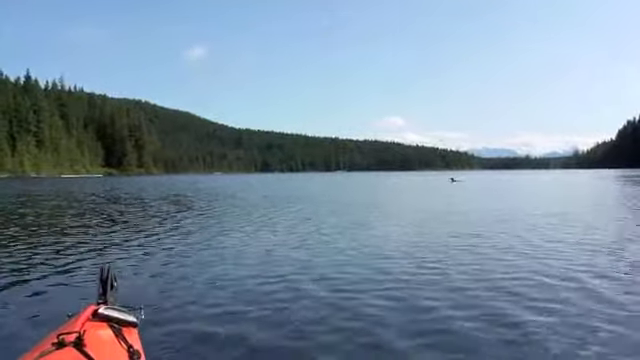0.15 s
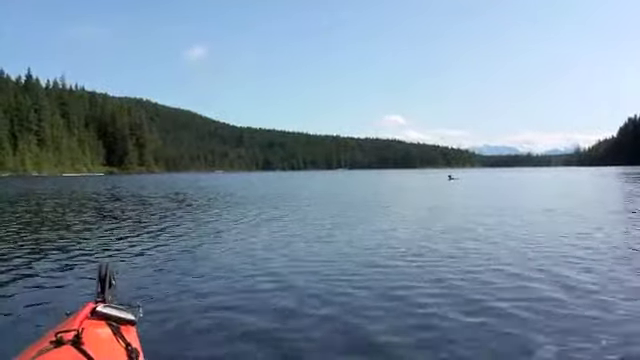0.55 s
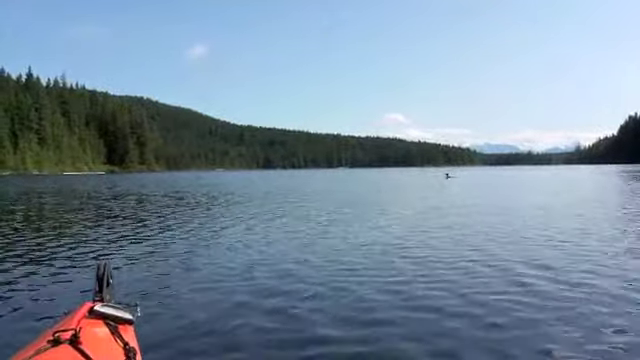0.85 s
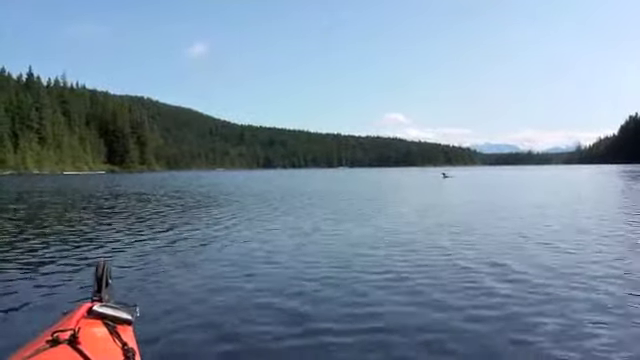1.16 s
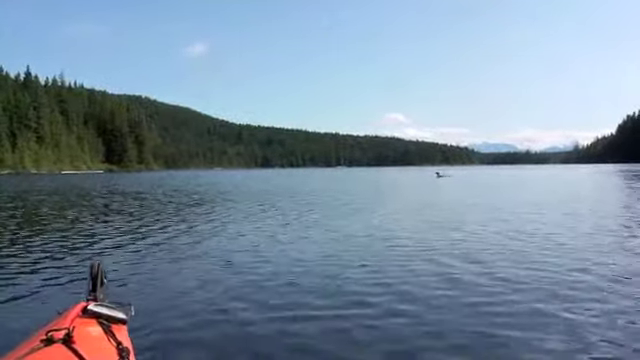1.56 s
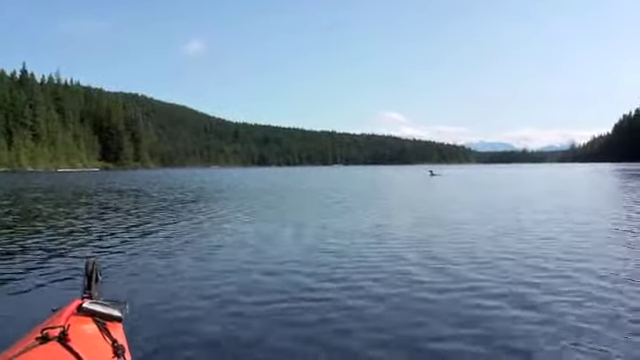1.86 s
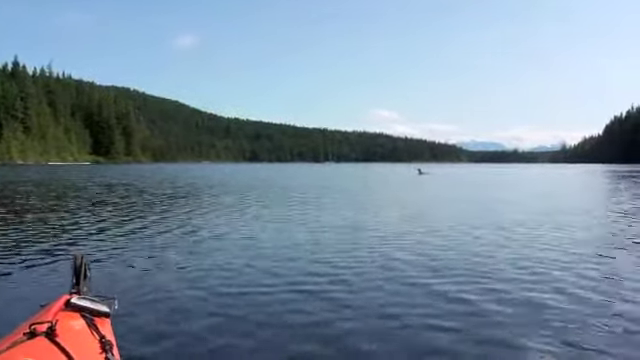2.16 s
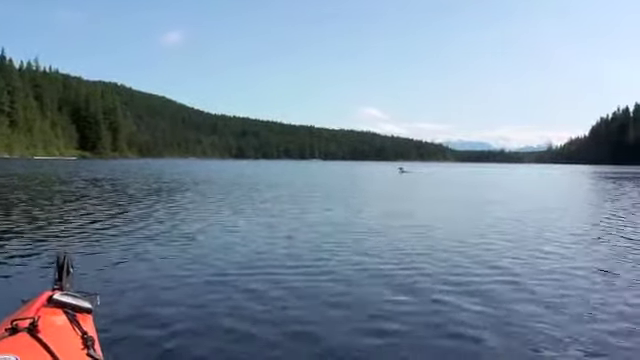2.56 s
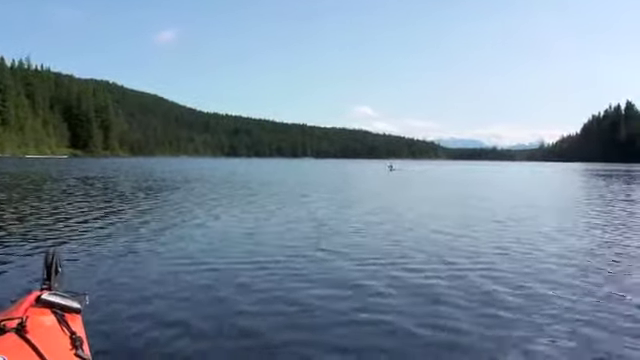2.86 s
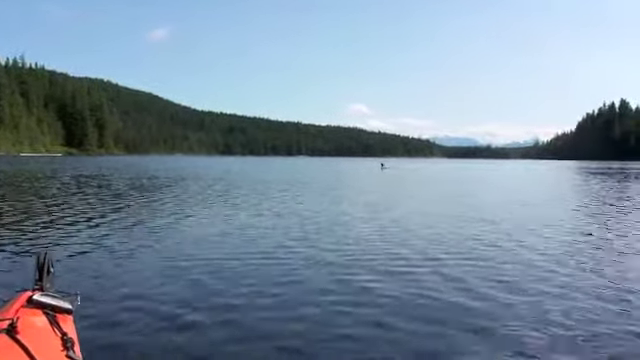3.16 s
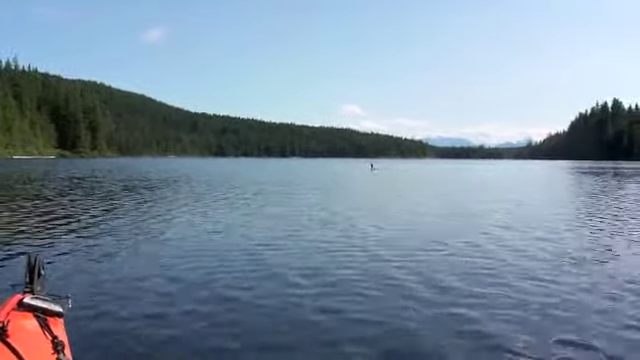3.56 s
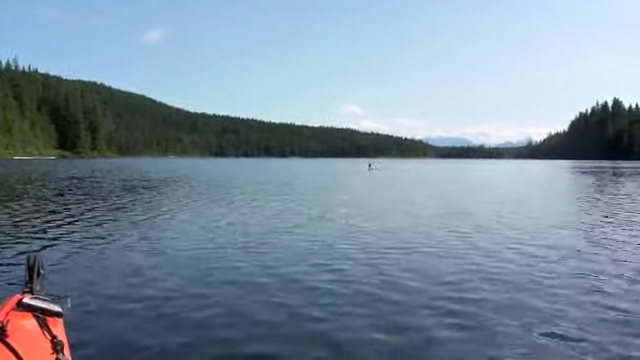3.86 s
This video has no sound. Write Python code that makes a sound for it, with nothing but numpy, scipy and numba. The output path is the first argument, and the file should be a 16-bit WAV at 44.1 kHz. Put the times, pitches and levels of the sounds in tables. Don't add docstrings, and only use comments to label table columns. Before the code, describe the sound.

Loon's wailing, tremolo call rings over a quiet lake following soft hiss and a motor's whine

```python
import sys
import numpy as np
from scipy import signal
from scipy.fft import rfft, irfft
from scipy.io import wavfile
from scipy.ndimage import uniform_filter1d
from numba import njit

SR = 44100
rng = np.random.default_rng(int(sys.argv[2]) if len(sys.argv) > 2 else 0)


def store_wav(level_fs):
    pcm = np.round(np.clip(np.atleast_2d(level_fs), -1, 1) * 32767)
    wavfile.write(sys.argv[1], SR, pcm.T.astype(np.int16))


def gain_from_decibels(decibels):
    exponent = np.asarray(decibels, float) / 20
    return 10 ** exponent


N = 176400


def level(x, db):
    return x * gain_from_decibels(db) / np.sqrt(np.mean(x ** 2))


def curve(table, hz):
    table_hz, value = np.array(table).T
    return np.interp(np.log(np.maximum(hz, 1)), np.log(table_hz), value)


def pan(x, db):
    return x * gain_from_decibels(np.array([db / 2, -db / 2]).reshape(2, -1))


@njit
def svf(x, hz, width):
    y, b, l = np.empty(len(x)), 0., 0.
    for i in range(len(x)):
        g, k = np.tan(np.pi * hz[i] / SR), width / hz[i]
        v = (b + g * (x[i] - l)) / (1 + g * (g + k))
        b, l, y[i] = 2 * v - b, l + 2 * g * v, k * v
    return y


def band(x, hz, width_hz):
    return svf(x + 1e-18, hz + np.zeros(N), float(width_hz))


def walk(rate_hz):
    k = int(SR / rate_hz)
    steps = np.repeat(rng.standard_normal(N // k + 1), k)
    return 2.1 * uniform_filter1d(uniform_filter1d(steps, k), k)[:N]


def noise(table, db, likeness):
    c = np.clip(likeness, -.95, .95)
    colour = gain_from_decibels(curve(table, np.fft.rfftfreq(N, 1 / SR)))
    mid, side = irfft(rfft(rng.standard_normal((2, N))) * colour, N)
    scale = gain_from_decibels(db) / np.sqrt(np.mean(mid ** 2) * (1 + c))
    return scale * (np.sqrt(1 + c) * mid + np.sqrt(1 - c) * side * np.array([[1], [-1]]))


# [Hz, dB per Hz]
HISS_SPECTRUM = [(18, -55.5), (30, -15.5), (48, -20.5), (81, -14.5), (205, -2), (277, -2), (525, -2.5),
                 (1720, -7), (2700, -17.5), (3510, -54.5), (5940, -120)]
# [Hz, dB per Hz]
AIR_SPECTRUM = [(1590, -40), (2700, -40.5), (3070, -30), (3420, -4), (4000, -11.5), (5470, 0.5),
                (7780, 3.5), (11000, -7.5), (14300, -42), (22000, -120)]


def microphone_hiss():
    hiss = pan(noise(HISS_SPECTRUM, -59.5, likeness=-0.31), 2.1) * gain_from_decibels(.4 * walk(1.3))
    air = pan(noise(AIR_SPECTRUM, -69.5, likeness=.15), 3) * gain_from_decibels(0.84 * walk(16))
    return hiss + air


# [s, dB]
CHIPS = [
    (3.375, -66.5),
    (3.61, -71.5),
    (3.643, -71),
    (3.677, -70),
    (3.84, -78),
    (3.975, -71),
]
CHIP_HZ, CHIP_S = 4800, .009
SWELL_S, SWELL_LENGTH_S, SWELL_HZ, SWELL_WIDTH_HZ, SWELL_DB = 2.45, .36, 56, 14, -81


def lake(t):
    swell = level(band(rng.standard_normal(N), SWELL_HZ, SWELL_WIDTH_HZ), SWELL_DB)
    swell = swell * np.exp(-((t - SWELL_S) / SWELL_LENGTH_S) ** 4)
    envelope = sum(gain_from_decibels(db) * np.exp(-((t - s) / CHIP_S) ** 2) for s, db in CHIPS)
    chips = envelope * np.sin(2 * np.pi * CHIP_HZ * t)
    return pan(swell, -2.5) + pan(chips, 4.)


ZOOM_ON_S, ZOOM_OFF_S = .748, 3.085
TICK_HZ, TICK_FIRST_S, TICK_DB, TICK_SCATTER_DB = 59.94, .0143, -52.5, 2.5
TICK_PITCH_HZ, TICK_WIDTH_HZ = 5920, 2600


def drive_ticks():
    times = np.arange(TICK_FIRST_S, N / SR - .01, 1 / TICK_HZ)
    size = gain_from_decibels(TICK_DB + TICK_SCATTER_DB * rng.standard_normal(len(times)))
    ticks = np.zeros(N)
    ticks[(times * SR).astype(int)] = size * ((times < ZOOM_ON_S) | (times > ZOOM_OFF_S))
    ticks = band(ticks, TICK_PITCH_HZ, TICK_WIDTH_HZ)
    return pan(6 * band(ticks, TICK_PITCH_HZ, 1.7 * TICK_WIDTH_HZ), 6.5)


# [s, dB, Hz, Hz]
KNOCKS = [
    (.7475, -39.5, 6800, 5000),
    (1.8525, -36, 1250, 1100),
    (.025, -48.5, 9500, 2600),
]


def housing_knocks(t):
    burst, out = rng.standard_normal(N), np.zeros(N)
    for s, db, hz, width_hz in KNOCKS:
        hit = burst * (t > s) * np.exp(-np.abs(t - s) / 0.0017)
        out = out + gain_from_decibels(db) * band(band(hit, hz, width_hz), hz, width_hz)
    return pan(out, 6.5)


WHISTLE_HZ, WHISTLE_FLIP_HZ, WHISTLE_DB, WHISTLE_LOW_DB = 7867, 15, -73.5, -85


def drive_whistle(t):
    flip = np.tanh(4.3 * np.sin(2 * np.pi * WHISTLE_FLIP_HZ * t))
    whistle = gain_from_decibels(WHISTLE_DB + .8 * walk(5.5)) * flip * np.sin(2 * np.pi * WHISTLE_HZ * t)
    low = gain_from_decibels(WHISTLE_LOW_DB) * np.cos(2 * np.pi * (WHISTLE_HZ - WHISTLE_FLIP_HZ) * t)
    return pan(whistle + low, 4.)


# [s, Hz, s]
SAGS = [(.775, 8330, 0.1), (0.902, 8500, 0.025), (0.98, 8500, 0.032), (1.044, 8100, 0.078),
        (1.125, 8100, 0.05), (1.163, 9400, 0.023), (1.23, 8500, .05), (1.277, 8500, 0.019),
        (1.39, 9000, 0.035), (1.464, 8140, 0.084), (1.632, 8270, 0.044), (1.752, 8180, 0.058),
        (2.056, 7950, 0.046), (2.182, 8000, 0.026), (2.26, 7640, 0.036), (2.365, 8200, 0.059),
        (2.488, 8040, 0.054), (2.514, 7800, .045), (2.702, 7950, 0.025), (2.75, 9000, 0.084),
        (2.83, 8500, .03), (2.856, 8080, 0.03), (2.926, 9100, 0.028), (2.998, 9440, 0.029),
        (3.065, 7900, 0.051)]
# [Hz, dB]
HOUSING = [(7600, 3.5), (8200, 2), (8800, -5), (9200, -2), (9600, -1), (10000, -2.5)]
ZOOM_HZ, ZOOM_WIDTH_HZ, ZOOM_DB, ZOOM_PAN_DB = 9705, 520, -67, 10.5
GEAR_HZ, GEAR_WIDTH_HZ, GEAR_DB, GEAR_LOAD_DB = 8500, 2000, -72, 4


def zoom_motor(t):
    dips = [(ZOOM_HZ - hz) * np.exp(-np.log(16) * ((t - s) / length) ** 2) for s, hz, length in SAGS]
    sag_hz = np.max(dips, axis=0)
    pitch = ZOOM_HZ - sag_hz + 90 * walk(60)
    whine = band(rng.standard_normal(N), pitch, ZOOM_WIDTH_HZ)
    whine = band(whine, pitch, 1.8 * ZOOM_WIDTH_HZ)
    whine = level(whine, ZOOM_DB) * gain_from_decibels(curve(HOUSING, pitch) + 1.72 * walk(60))
    gears = rng.standard_normal(N)
    for _ in range(3):
        gears = band(gears, GEAR_HZ, GEAR_WIDTH_HZ)
    gears = level(gears, GEAR_DB) * gain_from_decibels(GEAR_LOAD_DB * sag_hz / 1500 + 1.2 * walk(40))
    on = np.clip(np.minimum(t - ZOOM_ON_S, ZOOM_OFF_S - t) / 0.0057, 0, 1)
    return pan(on * (whine + gears), ZOOM_PAN_DB)


# [Hz, dB]
BIRD_PAN = [(600, 3), (750, 4.5), (880, 5), (1100, 1.5), (1500, 9.5), (2200, 16.5), (3000, 4.5), (8000, 10)]
# [Hz, dB]
PARTIAL_COLOUR = [(1750, -0.5), (1950, -1.5), (2200, -3.5), (2650, 3), (3200, -16.5), (4500, 1), (6500, 1),
                  (9500, -11)]
UPPER_SLOPE_DB, UPPER_GROWTH, ODD_DB = 1, 1.6, -4.5
AIR_LOSS_HZ, AIR_LOSS_DB = 9300, -14
BREATH_DB, BREATH_HZ = -34.5, 500


def note(t, points, voicing):
    s, hz, db = np.array(points).T
    attack_s, release_s, second_db, third_db, upper_db, ref_db, growth = voicing
    index = np.arange(len(s))
    place = np.interp(t, s, index)
    place = np.floor(place) + (1 - np.cos(np.pi * (place % 1))) / 2
    pitch, loud_db = np.interp(place, index, hz), np.interp(place, index, db)
    gate = np.minimum((t - s[0]) / attack_s + .5, (s[-1] - t) / release_s + .5)
    gate = np.sin(np.pi / 2 * np.clip(gate, 0, 1)) ** 2
    phase = 2 * np.pi * np.cumsum(pitch) / SR
    push_db = loud_db - ref_db
    partials_db = [0 * push_db, second_db + growth * push_db, third_db + .5 * growth * push_db]
    for k in range(9):
        static_db = upper_db + UPPER_SLOPE_DB * k + ODD_DB * (k % 2)
        partials_db.append(static_db + UPPER_GROWTH * growth * push_db)
    breath = gain_from_decibels(BREATH_DB) * walk(BREATH_HZ)
    out = np.zeros((2, N))
    for k, rel_db in enumerate(partials_db):
        partial_hz = (k + 1) * pitch
        rel_db = rel_db + curve(PARTIAL_COLOUR, partial_hz) + AIR_LOSS_DB * (partial_hz / AIR_LOSS_HZ) ** 6
        envelope = (1 + (1 + k) * breath) * gate ** (1 + k / 2) * gain_from_decibels(loud_db + rel_db)
        tone = np.sqrt(2) * envelope * np.sin((k + 1) * phase)
        out += pan(tone, curve(BIRD_PAN, partial_hz))
    return out


# [s, Hz, dB]
OPENING = [
    (3.054, 685, -31),
    (3.088, 759.6, -27),
    (3.122, 739, -32.5),
    (3.152, 680, -46),
]
# [s, Hz, dB]
TREMOLO = [
    (3.134, 908, -26),
    (3.19, 1113, -17),
    (3.249, 869.6, -26.5),
    (3.297, 1053, -19),
    (3.347, 856, -27.5),
    (3.397, 903.3, -24.5),
    (3.435, 862, -27),
    (3.475, 878, -27),
    (3.515, 852.6, -27.5),
]
# [s, Hz, dB]
FALLING = [
    (3.6, 639, -32),
    (3.641, 617, -35.5),
    (3.749, 586.4, -50),
]
# [s, Hz, dB]
RISING = [
    (3.846, 610.1, -38.5),
    (3.87, 625.4, -31),
    (3.95, 641.8, -29),
    (4.05, 659.8, -29),
]
# [s, s, dB, dB, dB, dB, dB per dB]
VOICING = [
    (.012, 0.013, 6, -19.5, -33, -26.5, 2.5),
    (0.019, 0.028, -17.5, -32.5, -35.5, -13.5, 0.82),
    (0.024, 0.029, -19, -38, -49.5, -32.5, 1.1),
    (0.017, .01, -15.5, -36, -51.5, -27, 0.4),
]
HOLD_S, HOLD_SAG_HZ, HOLD_FADE_DB = 0.096, 22, -10.5
BREAK_S, BREAK_HZ, BREAK_DB, BREAK_LENGTH_S = 3.136, 1170, -42.5, .008


def loon_call(t):
    s, hz, db = TREMOLO[-1]
    tail = [(s + 0.6 * HOLD_S, hz - 4, db - 2.0), (s + HOLD_S, hz - HOLD_SAG_HZ, db + HOLD_FADE_DB)]
    notes = (OPENING, list(TREMOLO) + tail, FALLING, RISING)
    call = sum(note(t, points, voicing) for points, voicing in zip(notes, VOICING))
    crack = np.exp(-((t - BREAK_S) / BREAK_LENGTH_S) ** 2) * np.sin(2 * np.pi * BREAK_HZ * t)
    return call + gain_from_decibels(BREAK_DB) * crack


NEAR_DB, NEAR_T60_S, REEDS_DB, REEDS_T60_S = -26, 0.17, -39, .6
SHORE_S, SHORE_RISE_S, SHORE_T60_S, SHORE_DB, SHORE_TOP_HZ = .58, 0.1, 1.6, -25, 1800


def scatter(envelope):
    return envelope * rng.standard_normal((2, SR)) / np.sqrt(np.sum(envelope ** 2))


def loon(t):
    call = loon_call(t)
    lag = t[:SR]
    water = gain_from_decibels(-60 * lag / NEAR_T60_S)
    reeds = gain_from_decibels(REEDS_DB - NEAR_DB - 10.5 - 60 * lag / REEDS_T60_S)
    near = scatter(np.hypot(water, reeds))
    rise = np.clip((lag - SHORE_S) / SHORE_RISE_S, 0, 1)
    shore = scatter(rise * gain_from_decibels(-60 * (lag - SHORE_S) / SHORE_T60_S))
    dull = 1 / (1 + (np.fft.rfftfreq(SR, 1 / SR) / SHORE_TOP_HZ) ** 4)
    space = gain_from_decibels(NEAR_DB) * near + gain_from_decibels(SHORE_DB) * irfft(rfft(shore) * dull, SR)
    return call + signal.fftconvolve(call.mean(axis=0)[None], space, axes=1)[:, :N]


def scene():
    t = np.arange(N) / SR
    camera = drive_ticks() + housing_knocks(t) + drive_whistle(t) + zoom_motor(t)
    return microphone_hiss() + lake(t) + camera + loon(t)


def band_limit(x):
    return signal.sosfilt(signal.butter(12, 11160, fs=SR, output="sos"), x)


# [Hz, Hz, dB]
NOTCHES = [
    (2936, 78, -23),
    (3980, 130, -20),
    (5066, 150, -32.5),
]
NOTCH_SCATTER, NOTCH_DRIFT_HZ = 0.41, 40
LOW_CUT_HZ, TOP_HZ, TOP_SCATTER_HZ = 33, 11010, 300
HOLE_SHARE, HOLE_DB, HOLE_LOW_HZ, HOLE_HIGH_HZ = .13, -16, 2900, 5200


def record(dry):
    hz, s, spec = signal.stft(dry, SR, nperseg=2048, noverlap=1536, boundary="even")
    hz, blocks = hz[:, None], len(s) // 3 + 1
    chance = np.repeat(rng.standard_normal((blocks, 7)), 3, axis=0)[:len(s)].T
    db = -40 / (1 + np.exp((TOP_HZ + TOP_SCATTER_HZ * chance[6] - hz) / 40))
    for k, (notch_hz, width_hz, depth_db) in enumerate(NOTCHES):
        centre = notch_hz + NOTCH_DRIFT_HZ * chance[k]
        width = width_hz * np.exp(NOTCH_SCATTER * chance[k + 3])
        db = db + depth_db * np.exp(-((hz - centre) / width) ** 4)
    holes = np.kron(rng.random((129, blocks)), np.ones((8, 3)))[:len(hz), :len(s)]
    db = db + HOLE_DB * (holes < HOLE_SHARE) * (hz > HOLE_LOW_HZ) * (hz < HOLE_HIGH_HZ)
    gain = gain_from_decibels(db) * hz ** 2 / (hz ** 2 + LOW_CUT_HZ ** 2)
    out = signal.istft(spec * gain, SR, nperseg=2048, noverlap=1536)[1][:, :N]
    return band_limit(out)


dry = scene()
out = record(dry)
store_wav(out)
```